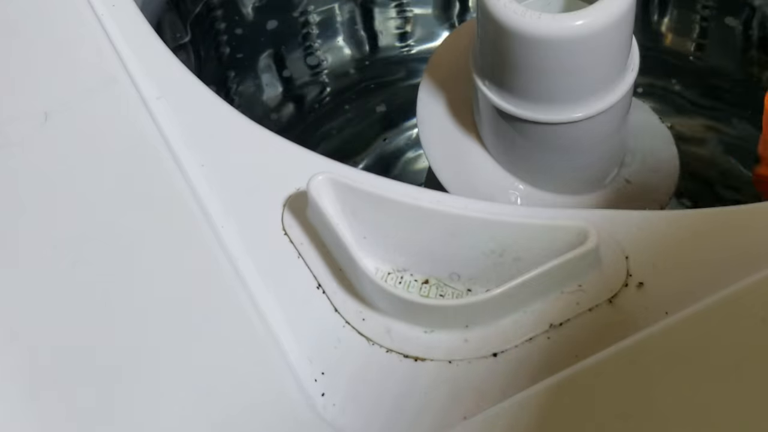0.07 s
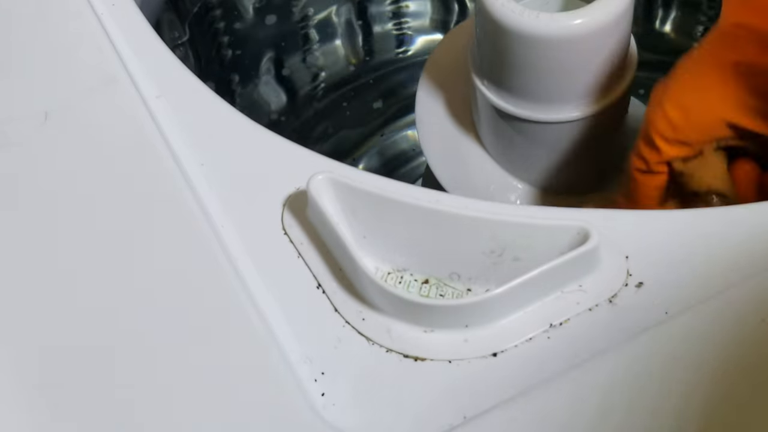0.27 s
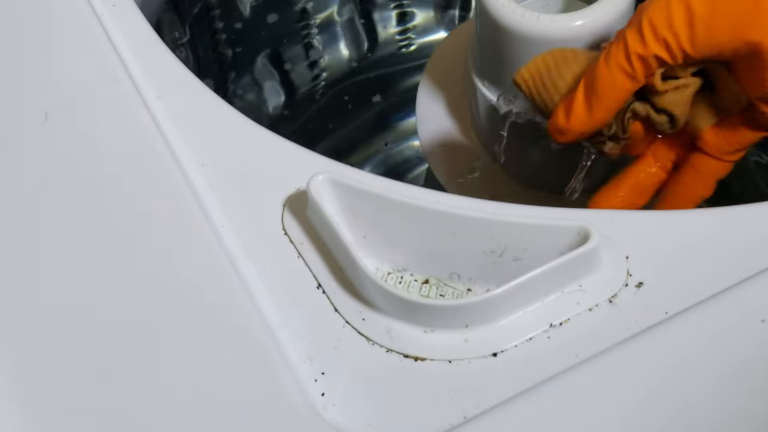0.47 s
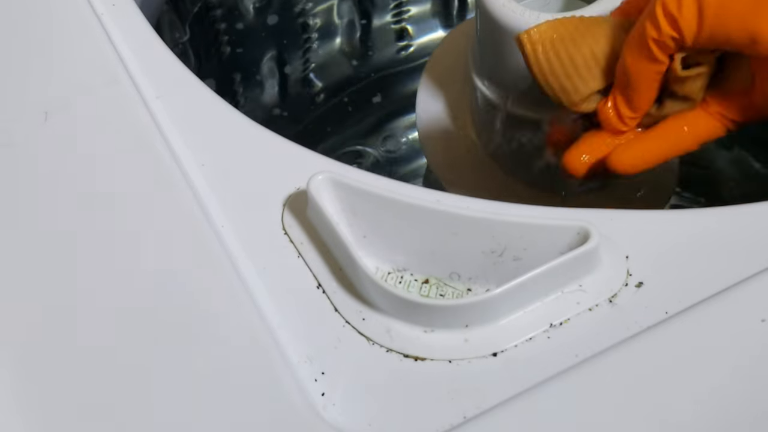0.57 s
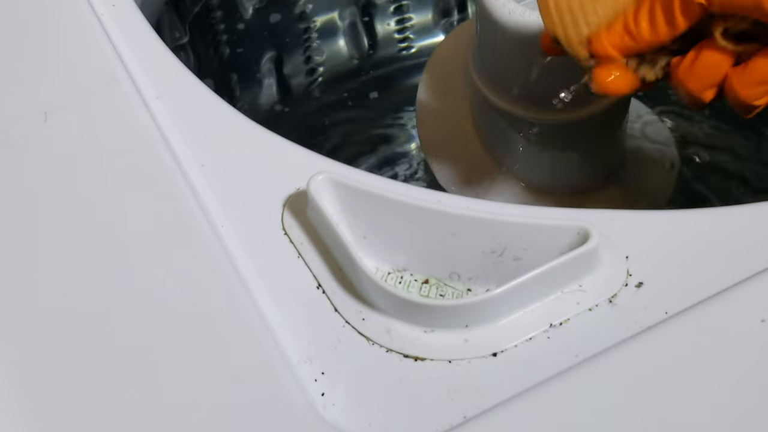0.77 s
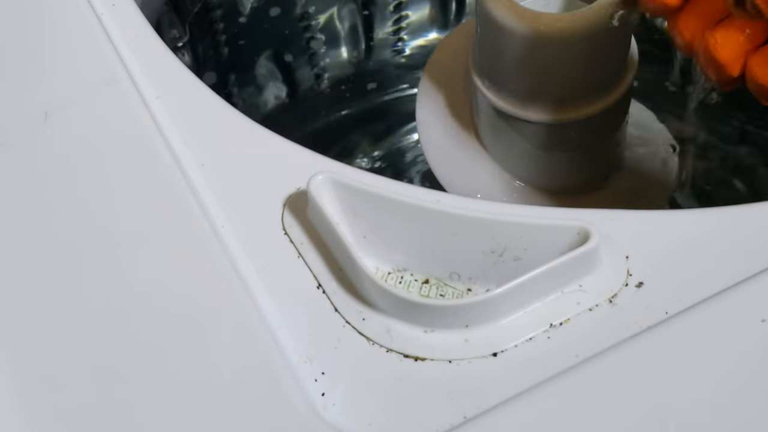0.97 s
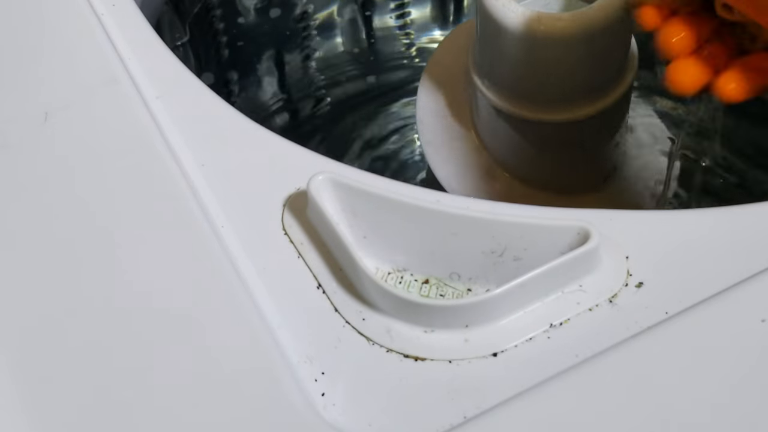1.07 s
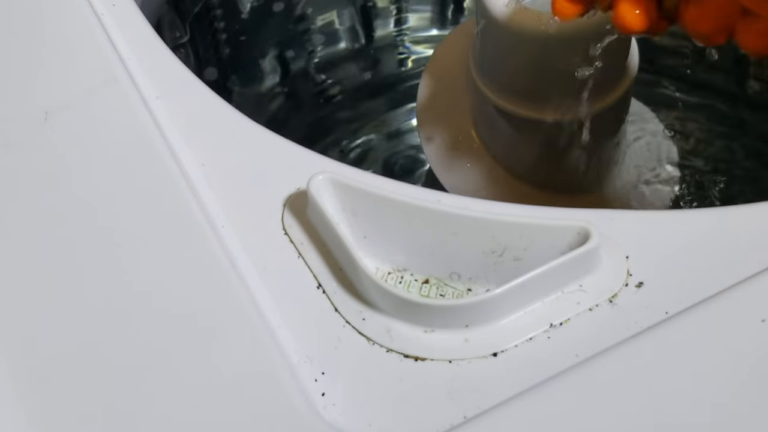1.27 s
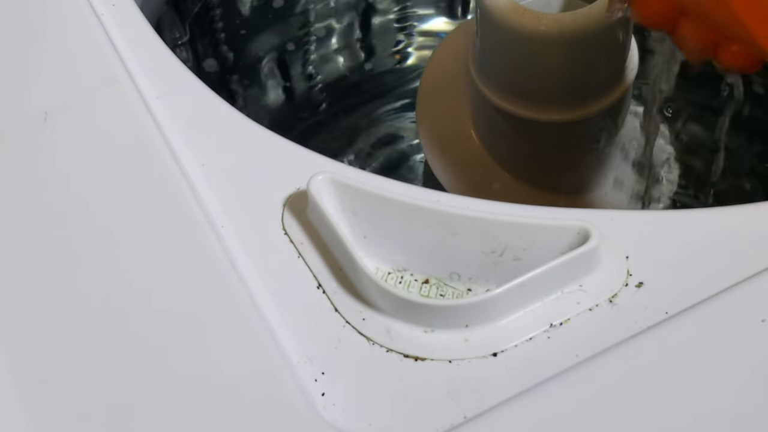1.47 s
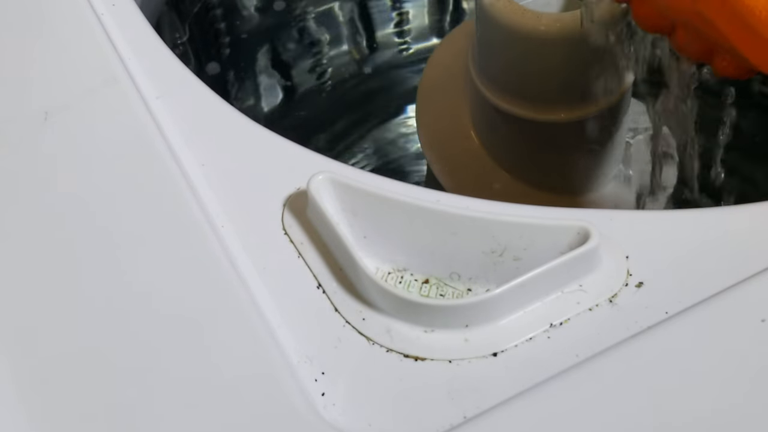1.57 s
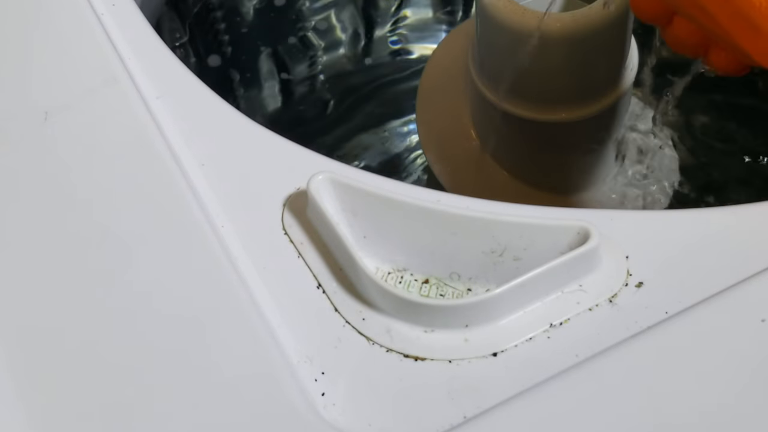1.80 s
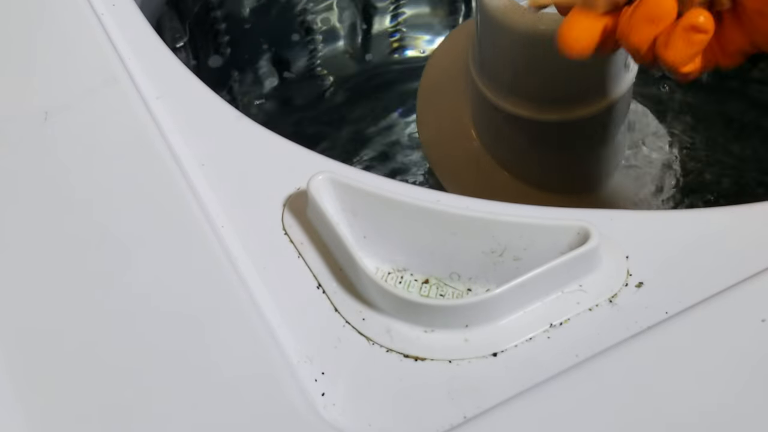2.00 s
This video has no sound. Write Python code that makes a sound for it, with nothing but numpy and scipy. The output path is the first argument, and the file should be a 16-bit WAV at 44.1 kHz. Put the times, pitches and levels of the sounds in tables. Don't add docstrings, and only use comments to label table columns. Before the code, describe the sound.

Water drips and splashes into a half-hollow, ringing washer tub, close and almost mono. Until 0.5 s there is mostly deep throbbing hum, soft room air and faint drops. Plops and a low bloop come at 0.55-0.7 s, then sparse drips. A bright splash at 1.1 s leads to thin trickling; the densest, hissing gush peaks around 1.5-1.7 s, then thins to bubbly drops by 2 s.

```python
import sys
import numpy as np
from scipy import signal
from scipy.fft import rfft, irfft
from scipy.io import wavfile
from scipy.ndimage import uniform_filter1d

SR = 44100
rng = np.random.default_rng(int(sys.argv[2]) if len(sys.argv) > 2 else 0)


def natural_amplitude(level_db):
    exponent = np.asarray(level_db, float) / 20
    return 10 ** exponent


def store_pcm(level_fs):
    pcm = np.round(np.clip(level_fs, -1, 1) * 32767).astype(np.int16)
    wavfile.write(sys.argv[1], SR, np.atleast_2d(pcm).T)


N = 90008

# (time [s], level [dB])
HUM_THROB = [(0.0, -23.5), (0.069, -23), (0.16, -25), (0.26, -33.5), (0.34, -24.5), (0.43, -21.5),
             (0.56, -29), (0.69, -23), (0.89, -29), (0.99, -26), (1.32, -24), (1.49, -28), (1.6, -27),
             (1.7, -30.5), (1.88, -22.5), (2.04, -26.5)]
# (frequency [Hz], level re hum [dB], wobble width [Hz])
HUM_OVERTONES = [(62.2, -15.5, 9.3), (89, -22, 7.6), (120.6, -26.5, 4.9)]
HUM_HZ, OVERTONE_LAG_S = 30.2, 0.056

# (frequency [Hz], density [dB per Hz])
AIR_COLOUR = [(40, -2.5), (100, -3.5), (300, -9.5), (520, -13.5), (2000, -13.5), (5000, -23.5), (8500, -31),
              (15600, -32)]
# (time [s], level [dB])
AIR_SWELL = [(0.0, 1.5), (0.4, 3.5), (0.9, -3), (1.3, 2.5), (2.04, 2)]
AIR_DB, AIR_SIDE_DB = -44, 1.5

# (time [s], peak [dB], pitch [Hz], decay [cycles])
BUBBLES = [(0.04, -30.5, 410, 1.6), (0.186, -32.5, 2210, 11), (0.252, -22, 1907, 2.6),
           (0.327, -29.5, 1305, 7.3), (0.55, -18, 1164, 3.7), (0.647, -18.5, 607, 2.8),
           (0.809, -27, 1750, 2.9), (0.917, -25, 1694, 5.4), (1.024, -33.5, 676, 5.4),
           (1.074, -20, 1850, 8.8), (1.108, -31.5, 1300, 4.4), (1.145, -14.5, 1650, 5.2),
           (1.519, -18, 1710, 3.6), (1.533, -22.5, 2270, 5.0), (1.58, -18.5, 1095, 2.7),
           (1.611, -24, 1330, 9.5), (1.676, -15.5, 1513, 4.5), (1.749, -19.5, 2083, 7.3),
           (1.884, -21, 842, 5.6), (1.978, -22.5, 1196, 2.3),
           (0.2244, -34, 2860, 2.4), (0.3444, -29, 3000, 1.2), (0.3645, -30.5, 2800, 1.2),
               (0.4763, -25, 2800, 0.88), (0.5275, -27, 3860, 3.5), (0.61, -28.5, 2300, 2.2),
               (0.6632, -25.5, 4600, 1.1), (0.7189, -27.5, 4420, 3.4), (0.8071, -32, 3420, 1.8),
               (0.915, -26.5, 2280, 1.6), (0.9958, -27, 5040, 1), (1.072, -19, 4740, 1.75),
               (1.1526, -18, 2610, 2.9), (1.152, -22.5, 3400, 3.6), (1.307, -30, 2540, 2.5),
               (1.476, -12.5, 4860, 2.5), (1.5208, -15, 3150, 2.2), (1.568, -13, 2314, 3.7),
               (1.59, -13.5, 3620, 3), (1.555, -13, 3310, 3.2), (1.6087, -16.5, 4840, 3.9),
               (1.6347, -14.5, 2510, 2.7), (1.6791, -40, 2600, 1.3), (1.828, -21.5, 4500, 3.0),
               (1.883, -30.5, 4200, 2.2), (1.972, -29.5, 5130, 2.8),
           (0.002, -27, 364, 3.1), (0.215, -52, 980, 3.5), (0.5495, -19, 1460, 5.3),
           (0.552, -26, 1040, 16.7), (0.61, -40, 7100, 2.7), (0.72, -30, 6900, 1.9), (0.51, -23, 730, 3.4),
           (0.83, -37, 1500, 6.0), (0.926, -31, 2200, 5.5), (1.075, -23, 3660, 1.5),
           (1.075, -25.5, 6070, 7.6), (1.535, -27, 664, 2.5), (1.608, -24.5, 497, 5.1),
           (1.678, -32, 1200, 6.9), (1.69, -30, 654, 3.4), (1.722, -33, 640, 8.4), (1.72, -21, 1800, 8.1),
           (2, -34, 2100, 14.9), (1.895, -23, 950, 7.4), (1.538, -15, 3000, 3.8), (0.647, -24, 1203, 3.7),
           (0.549, -23.5, 2020, 1.3), (1.883, -27, 1730, 1.6), (1.655, -16, 4300, 1.8),
           (1.625, -16.5, 3470, 2.9), (1.69, -22, 5500, 3)]
POPS_DB, PITCH_RISE = -8.5, 0.05

# (frequency [Hz], level [dB], t60 [s])
TUB_MODES = [(601, -3.5, 0.42), (666, -1.5, 0.23), (836, -23, 0.046), (1014.7, -4, 0.56), (1047, -1, 0.14),
             (1185, -1.5, 0.31), (1363, -2, 0.14), (1521, 2.5, 0.15), (1644, 0.5, 0.11), (1715, -7.5, 0.19),
             (2053, 2, 0.049), (2430, -3, 0.19), (2714, -4.5, 0.079)]
# (frequency [Hz], t60 [s])
TAIL_DECAY = [(400, 0.63), (1500, 0.37), (5000, 0.34), (14000, 0.096)]
# (frequency [Hz], level [dB])
SIDE_WIDTH = [(60, -60), (240, -28), (950, -31), (3770, -26), (15000, -28)]
DIRECT_DB, MODES_DB, TAIL_DB = -10.5, -14, -1
BUILD_S, HOLD_S = 0.0011, 0.034

# (time [s], flow [dB])
WATER_FLOW = [(0.0, -85), (0.2, -52.5), (0.3, -52), (0.451, -51.5), (0.55, -42), (0.75, -53.5), (0.87, -52),
              (0.97, -50), (1.1, -39.5), (1.3, -41), (1.45, -38), (1.53, -33.5), (1.6, -29.5), (1.7, -35),
              (1.76, -37.5), (1.82, -39.5), (1.922, -43.5), (2.04, -50.5)]
# (frequency [Hz], density [dB per Hz])
SPRAY_COLOUR = [(250, -42), (450, -14), (700, -4.5), (1500, -4), (3400, -3), (5500, -5), (8500, -18),
                (13000, -15)]
SPRAY_DB, GRAINS_PER_S, GRAIN_SPREAD_DB, GRAIN_CYCLES = 2, 5000, 3.5, 3.8

# (time [s], peak [dB])
MIST_BURSTS = [(0.216, -36.5), (.364, -43), (.476, -47), (0.608, -37), (.659, -42), (.719, -42),
               (0.912, -37.5), (.995, -41), (1.072, -35.5), (1.14, -29.5), (1.305, -34.5), (1.453, -36.5),
               (1.518, -29), (1.61, -24), (1.677, -24.5), (1.826, -35), (1.882, -35)]
# (frequency [Hz], density [dB per Hz])
MIST_COLOUR = [(3000, -42), (6000, 2), (8500, -7.5), (11500, -1.5), (15500, -3)]
MIST_DB, MIST_RISE_S, MIST_T60_S = -10, 0.002, 0.16

# (time [s], level [dB], start pitch [Hz], end pitch [Hz], length [s])
AIR_POCKETS = [(0.329, -46, 1316, 1403, 0.08), (.345, -43.5, 3050, 2994, 0.038),
               (.553, -34, 1026, 1056, .06), (.55, -34.5, 1187, 1135, 0.043),
               (0.657, -22.5, 579.6, 659, 0.0684), (0.73, -33.5, 661, 636, 0.036),
               (.77, -43.5, 615, 627, 0.039), (.83, -45, 607, 630, 0.039), (.82, -40, 1508, 1517, 0.042),
               (1.159, -32.5, 2784, 2740, .055), (1.149, -32.5, 2060, 2100, .03),
               (1.172, -36, 1708, 1672, 0.059), (1.541, -33, 640, 586, 0.016),
               (1.562, -35, 620, 690, 0.012), (1.581, -29.5, 1030, 1040, .02),
               (1.604, -31.5, 550, 630, 0.019), (1.647, -31, 752, 797, 0.02), (1.689, -35, 604, 694, .022),
               (1.7, -29.5, 1546, 1540, .014), (1.719, -36.5, 668, 646, 0.027),
               (1.75, -29.5, 2126, 2190, 0.042), (1.839, -40, 1020, 1050, 0.023),
               (1.885, -28, 832, 899, 0.058), (1.937, -34, 977, 1020, 0.024),
               (1.93, -38.5, 1185, 1220, 0.027), (1.952, -38, 1555, 1570, 0.014),
               (1.97, -30.5, 1204, 1194, 0.033), (1.997, -39, 1170, 1194, 0.022),
               (2.02, -36.5, 1185, 1160, .024), (1.26, -46, 1904, 1840, 0.057),
               (1.347, -41.5, 1845, 1936, 0.063), (1.405, -41, 1857, 1886, 0.053),
               (1.45, -46, 1880, 1900, 0.046), (1.348, -42, 2700, 2800, 0.067)]
SINGERS_DB, SINGERS_TO_TUB_DB = -1.96, -10.5

# (frequency [Hz], width [Hz], level [dB])
TRICKLE_TONES = [(1870, 34, -3), (2570, 91, -6.5), (3830, 100, -11)]
TRICKLE_START_S, TRICKLE_END_S, TRICKLE_DB = 1.22, 1.8, -40

# (time [s], length [s], lost above [Hz])
TREBLE_DROPOUTS = [(.035, .009, 6000), (.101, .009, 5500), (.165, .011, 7000), (.335, .011, 8000),
                   (.4, .008, 7500), (.452, .028, 9600)]
BAND_EDGE_HZ = 15680


def read(points, hz):
    f, value = np.transpose(points)
    return np.interp(np.log(hz + 1), np.log(f + 1), value)


def evened(x):
    return x / np.sqrt(np.mean(x ** 2) + 1e-20)


def coloured(x, points):
    gain = natural_amplitude(read(points, np.fft.rfftfreq(len(x), 1 / SR)))
    return irfft(rfft(x) * gain, len(x))


def add(mix, start_s, sound):
    part = mix[round(start_s * SR):][:len(sound)]
    part += sound[:len(part)]


def whistle(hz, width_hz):
    f = np.fft.rfftfreq(N, 1 / SR)
    real, imag = rng.standard_normal((2, len(f)))
    resonance = 1 + 1j * 2 * (f - hz) / width_hz
    return evened(irfft((real + 1j * imag) / resonance, N))


def motor():
    t = np.arange(N) / SR
    s, db = np.transpose(HUM_THROB)
    throb_db = [np.interp(t - lag_s, s, db) for lag_s in (0, OVERTONE_LAG_S)]
    level, late_level = natural_amplitude(uniform_filter1d(throb_db, size=2000, mode="nearest"))
    out = np.sqrt(2) * level * np.sin(2 * np.pi * HUM_HZ * t)
    for hz, over_db, width_hz in HUM_OVERTONES:
        steady = np.sin(2 * np.pi * (hz * t + rng.random()))
        out += late_level * natural_amplitude(over_db) * (steady + 0.45 * whistle(hz, width_hz))
    return out


def air():
    noise = coloured(rng.standard_normal(N), AIR_COLOUR)
    hz, t, z = signal.stft(noise, SR, nperseg=1024)
    patches = uniform_filter1d(rng.standard_normal(z.shape), size=20, axis=0)
    patches = evened(uniform_filter1d(patches, size=4, axis=1))
    swell_db = np.interp(t, *np.transpose(AIR_SWELL)) * (hz < 600)[:, None]
    drifting = signal.istft(z * natural_amplitude(2.0 * patches + swell_db), SR, nperseg=1024)[1][:N]
    return natural_amplitude(AIR_DB) * evened(drifting)


def bubble(hz, cycles):
    cycles = max(cycles, 0.5)
    u = np.arange(2000) / SR * hz / cycles
    envelope = np.minimum(u / 0.12, 1) * np.exp(-u) * (u < 6)
    return envelope * np.sin(2 * np.pi * cycles * (u + PITCH_RISE * u ** 2 / 2))


def pops():
    out = np.zeros(N)
    for s, db, hz, cycles in BUBBLES:
        shortness = np.sqrt(hz / max(cycles, 0.5) / 25)
        add(out, s, natural_amplitude(db) * bubble(hz, cycles) * shortness)
    return natural_amplitude(POPS_DB) * out


def tail():
    hz, t, z = signal.stft(rng.standard_normal(SR // 2), SR, nperseg=256)
    decay_db = -60 * np.maximum(t - HOLD_S / 2, 0) / read(TAIL_DECAY, hz)[:, None]
    decay_db = decay_db - 3.8 * (t > HOLD_S)
    x = signal.istft(z * natural_amplitude(decay_db), SR, nperseg=256)[1]
    x = x * np.minimum(np.arange(len(x)) / SR / BUILD_S, 1)
    return x / np.linalg.norm(x)


def echoes(x):
    turn = np.arange(N) / SR * 25
    out = np.zeros(N)
    for k in range(3):
        share = np.cos(turn + k * np.pi / 3) * np.sqrt(2 / 3)
        out += signal.oaconvolve(x * share, tail())[:N]
    return out


def tub(x):
    t = np.arange(SR // 2) / SR
    rings = np.zeros(len(t))
    for hz, db, t60_s in TUB_MODES:
        rings += natural_amplitude(db - 60 * t / t60_s) * np.sin(2 * np.pi * (hz * t + rng.random()))
    rings *= natural_amplitude(MODES_DB - 35)
    mid = natural_amplitude(DIRECT_DB) * x + signal.oaconvolve(x, rings)[:N] + natural_amplitude(TAIL_DB) * echoes(x)
    side = coloured(signal.oaconvolve(x, tail())[:N], SIDE_WIDTH)
    return mid, side


def spray():
    size_db = GRAIN_SPREAD_DB * np.minimum(rng.exponential(1, N), 2.6)
    size = natural_amplitude(size_db) * (rng.random(N) < GRAINS_PER_S / SR)
    kind = rng.integers(0, 24, N)
    spectrum = 0
    for k, hz in enumerate(np.geomspace(400, 15500, num=24)):
        grain = bubble(hz, GRAIN_CYCLES)
        grain = grain / np.linalg.norm(grain) * np.sqrt(hz)
        spectrum = spectrum + rfft(size * (kind == k), 98304) * rfft(grain, 98304)
    flow_db = np.interp(np.arange(N) / SR, *np.transpose(WATER_FLOW))
    return natural_amplitude(SPRAY_DB + flow_db) * evened(coloured(irfft(spectrum), SPRAY_COLOUR)[:N])


def mist():
    power = np.zeros(N)
    t = np.arange(SR // 4) / SR
    for s, db in MIST_BURSTS:
        fall_db = 60 * np.maximum(t - HOLD_S, 0) / MIST_T60_S
        add(power, s, natural_amplitude(db - fall_db) ** 2 * np.minimum(t / MIST_RISE_S, 1))
    mid, side = (evened(coloured(rng.standard_normal(N), MIST_COLOUR)) for _ in "ms")
    fizz_db = 2.0 * evened(uniform_filter1d(rng.exponential(1, N) ** 2 - 2, size=60))
    level = natural_amplitude(MIST_DB + np.minimum(fizz_db, 9)) * np.sqrt(power)
    return level * mid, natural_amplitude(-3) * level ** 2 / level.max() * side


def singers():
    out = np.zeros(N)
    for s, db, from_hz, to_hz, length_s in AIR_POCKETS:
        u = np.arange(0, length_s, 1 / SR) / length_s
        cycles = length_s * (from_hz * u + (to_hz - from_hz) * u ** 2 / 2)
        add(out, s, natural_amplitude(db) * np.sin(np.pi * u ** 0.61) * np.sin(2 * np.pi * cycles))
    return natural_amplitude(SINGERS_DB) * np.sqrt(2) * out


def trickle():
    t = np.arange(N) / SR
    gate = np.clip(np.minimum(t - TRICKLE_START_S, TRICKLE_END_S - t) / 0.057, 0, 1)
    tones = sum(natural_amplitude(db) * whistle(hz, width_hz) for hz, width_hz, db in TRICKLE_TONES)
    return natural_amplitude(TRICKLE_DB) * gate * tones


def scene():
    song = singers()
    mid, side = tub(pops() + spray() + trickle() + natural_amplitude(SINGERS_TO_TUB_DB) * song)
    hiss, wide_hiss = mist()
    side = side + wide_hiss - natural_amplitude(-19) * (mid + song)
    mid = mid + song + hiss + motor() + air()
    side = side + natural_amplitude(AIR_SIDE_DB) * coloured(air(), SIDE_WIDTH)
    return np.array([mid + side, mid - side])


def treble_dropouts(x):
    hz, t, z = signal.stft(x, SR, nperseg=128)
    lost = sum((abs(t - s) < length_s / 2) & (hz[:, None] > above_hz)
               for s, length_s, above_hz in TREBLE_DROPOUTS)
    return signal.istft(z * natural_amplitude(-40 * lost), SR, nperseg=128)[1][:, :N]


def band_limit(x):
    return signal.sosfilt(signal.butter(12, 15710, fs=SR, output="sos"), x)


def record(dry):
    edge = signal.firwin(801, BAND_EDGE_HZ, window=("kaiser", 9), fs=SR)
    limited = signal.oaconvolve(dry, edge[None], "same")
    mix = treble_dropouts(limited)
    return band_limit(mix)


dry = scene()
out = record(dry)
store_pcm(out)
```